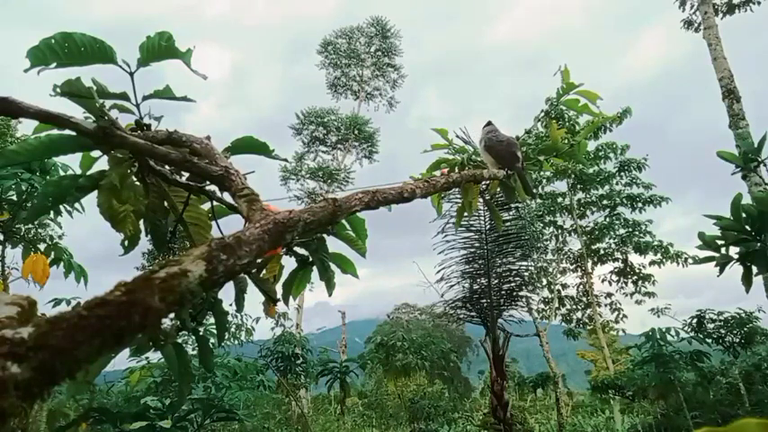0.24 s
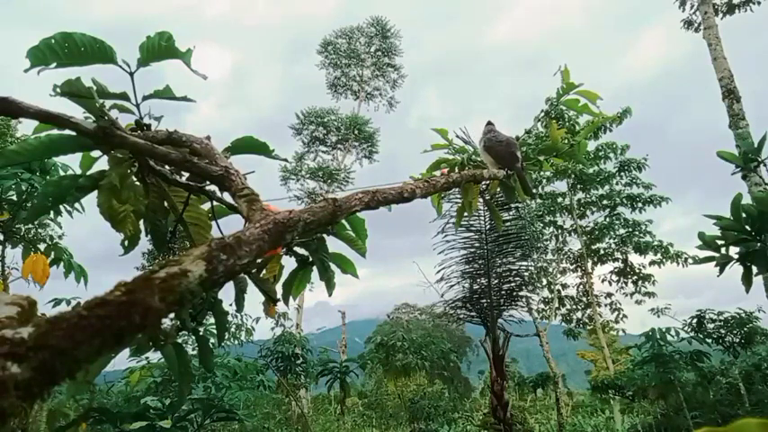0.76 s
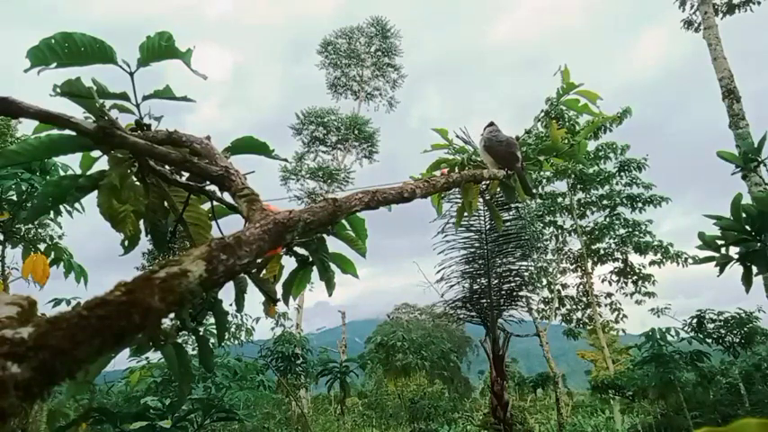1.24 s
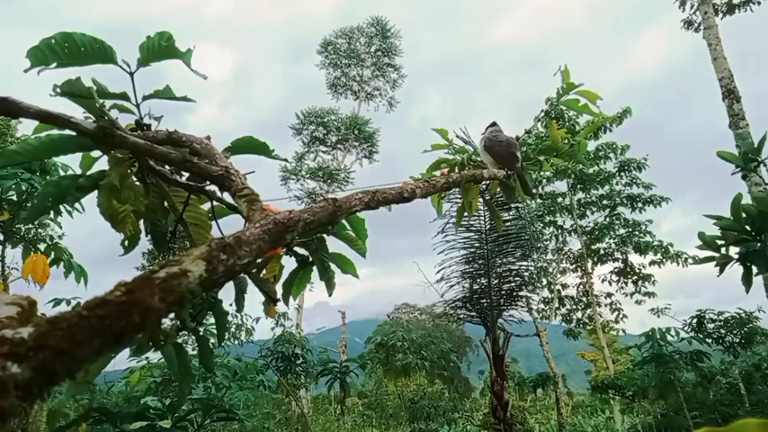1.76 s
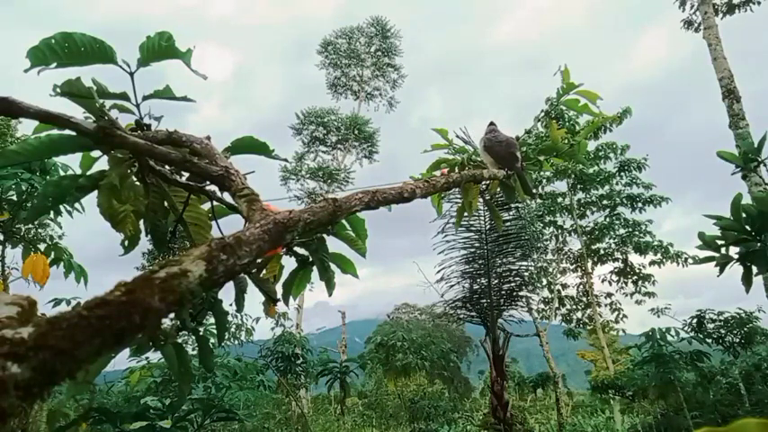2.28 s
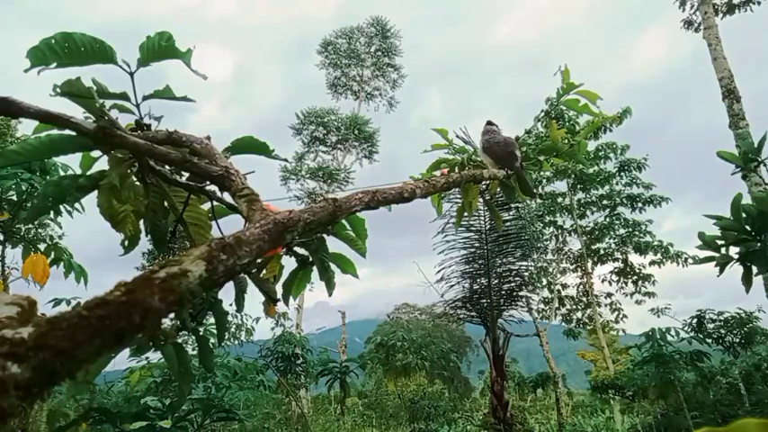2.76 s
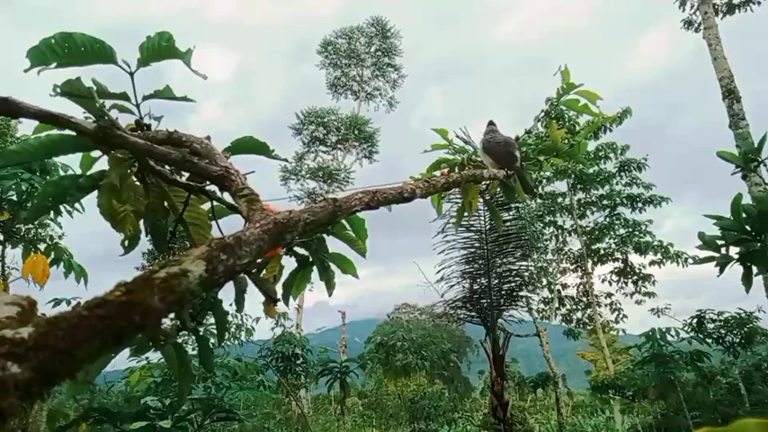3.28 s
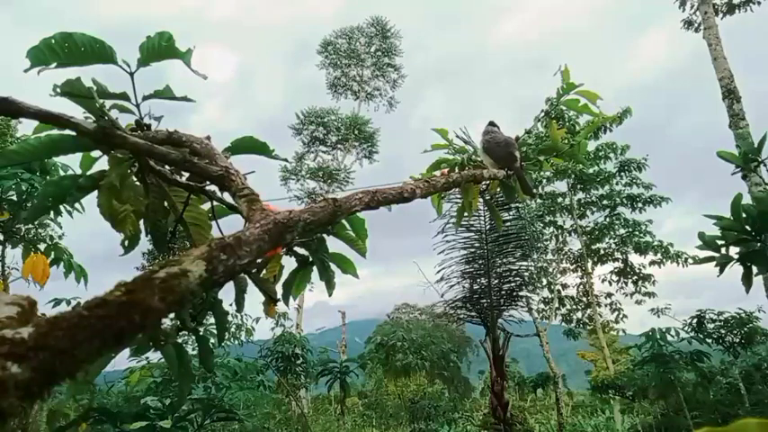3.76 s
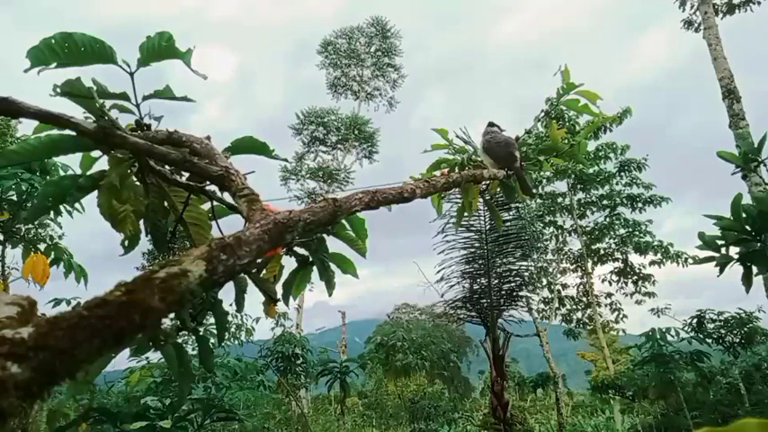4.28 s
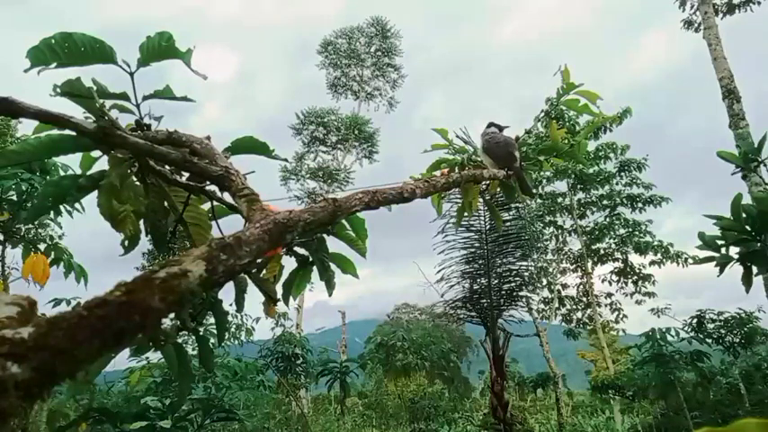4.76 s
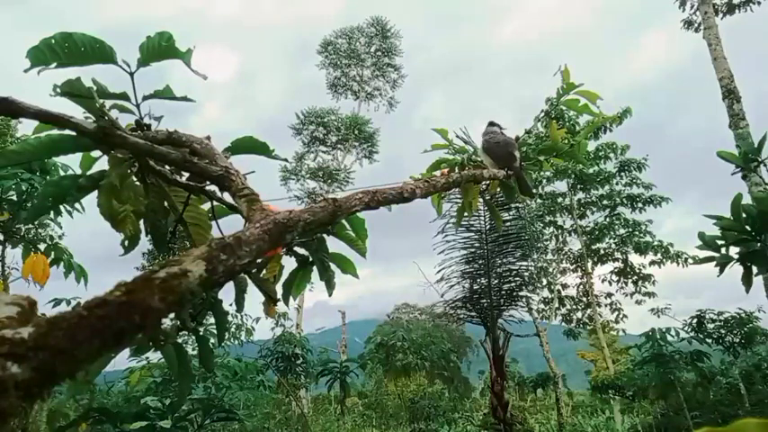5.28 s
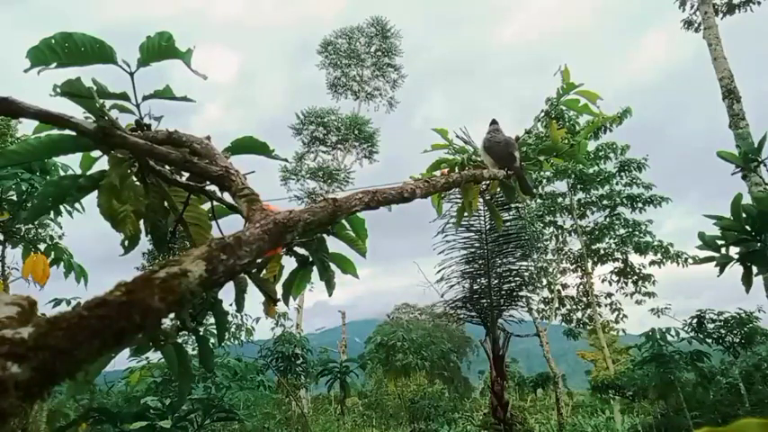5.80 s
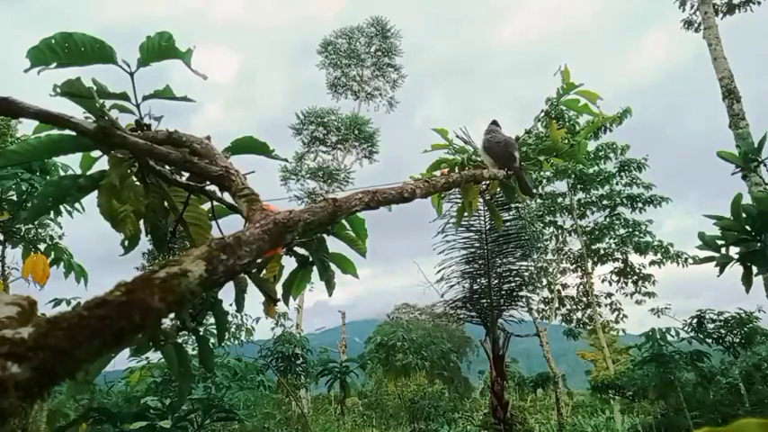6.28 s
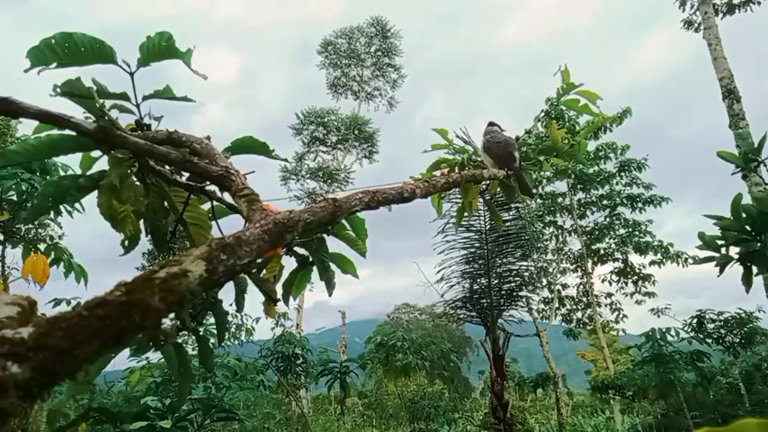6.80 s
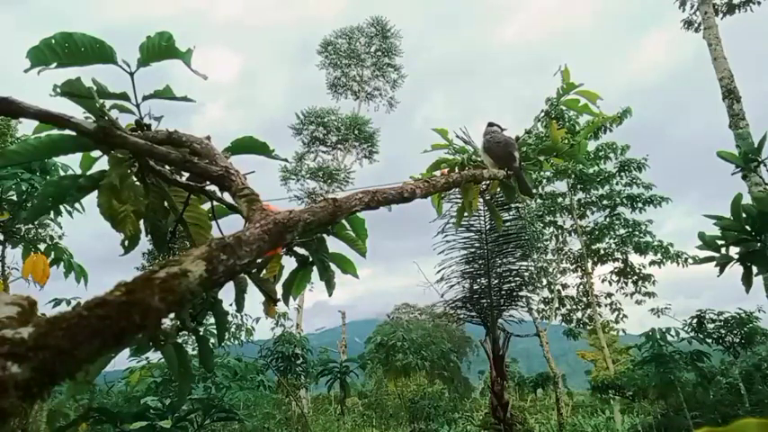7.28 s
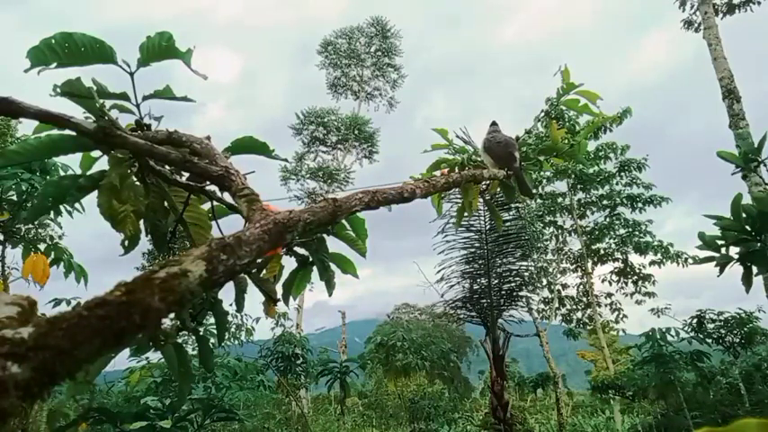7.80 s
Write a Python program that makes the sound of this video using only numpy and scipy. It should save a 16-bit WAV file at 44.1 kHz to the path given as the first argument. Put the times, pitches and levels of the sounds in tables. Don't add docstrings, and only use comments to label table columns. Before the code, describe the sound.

An outdoor wooded slope with a steady, gently swelling low rumble, soft insect-filled air and thin microphone hiss. At 0.6, 0.8 and 1.05 seconds a neighbouring bird gives short, dry rattles. At 1.1 the main bird bursts in, close and very loud: a tiny fluttering buzz, then quick piercing whistles that hook up and arch over, ending on a held note by 1.4. The background drops and slowly recovers. Faint distant rattles follow at 1.7-2.2 and 2.8-3.5, with soft coos near 3.2. The phrase repeats at 3.7-4.0, its last note rising, answered by faint far singers. Three stronger rattles come at 5.3-5.7, then a distant wavering cock crow until 6.4. Four quieter rattles run from 6.7 to 7.25, leading to the third phrase at 7.3-7.6, its last note fading. Short echoes scatter from the trees, and the ducked rumble returns until 8 seconds.

```python
import sys
import numpy as np
from scipy import signal
from scipy.fft import rfft, irfft, next_fast_len
from scipy.io import wavfile
from scipy.ndimage import uniform_filter1d

SR = 44100
rng = np.random.default_rng(int(sys.argv[2]) if len(sys.argv) > 2 else 0)


def master_out(mix):
    frames = np.transpose(np.atleast_2d(mix))
    ceiling = np.clip(frames, -1, 1)
    pcm = np.round(ceiling * 32767).astype(np.int16)
    wavfile.write(sys.argv[1], SR, pcm)


def gain_from_decibels(decibels):
    exponent = np.asarray(decibels, float) / 20
    return 10 ** exponent


N = 354652

# freq_hz, density_db
RUMBLE = [(12, -52), (20, -31), (38, -31), (70, -6), (151, 1), (290, -8), (347, -12), (472, -19),
          (677, -22), (1500, -33), (1950, -62.5), (3300, -120)]
# freq_hz, density_db
AIR = [(900, -30), (1250, -12.5), (1700, -3), (2300, -1.5), (3000, -3.5), (3600, -5), (4300, -10),
       (5000, -17.5), (5500, -15), (6200, -8.5), (6900, -16.5), (7900, -8), (8700, -12), (9500, -28.5)]
# freq_hz, density_db
HISS = [(7000, -18.5), (9500, 1.5), (12000, -4), (15500, -5.5), (16500, -30.5)]
RUMBLE_DB, AIR_DB, HISS_DB = -37.5, -54, -81
# time_s, level_db
SWELL = [(0, 0), (.8, 3), (1.3, -1), (1.8, 5), (2.5, 0.5), (3.4, 1.5), (4.2, 1.5), (4.9, 1), (5.9, 2),
         (6.6, 0), (7.2, 1.5), (7.5, -1.5), (8.04, 4)]

# start_s, drop_db
DUCKS = [
    (1.25, 12.5),
    (3.871, 11),
    (7.428, 13),
]
DUCK_ATTACK_S, DUCK_RELEASE_S, START_DROP_DB = 0.011, 1.15, 1.32
CEILING = 1.02

# level_db, decay_60db_s
NEAR_TRUNKS = (-18, .17)
# level_db, decay_60db_s
SLOPE = (-36, 1.15)
# delay_s, spread_s, level_over_slope_db
STAND = (.125, 0.014, 9)
# near_trunks_db, slope_db
FAR_ECHO_DB = (-2, -11)
LEAF_CUT_HZ = 2100

# time_s, pitch_hz, level_db
CROW = [
    [(5.7, 615, -50), (5.82, 748, -58.5), (5.89, 842, -44.5), (5.99, 827, -43), (6.03, 798, -50.5),
     (6.06, 814, -42), (6.26, 819, -44), (6.3, 803, -59), (6.44, 790, -54.5)],
]
# start_s, length_s, first_hz, last_hz, level_db
FAR_CHIRPS = [(3.515, .11, 3530, 3480, -57), (4.28, .07, 3250, 2850, -59), (4.37, .04, 2750, 3050, -62),
              (1.96, .1, 2960, 2940, -66), (5.98, .1, 2860, 2850, -66), (6.12, .08, 2850, 2830, -67),
              (6.22, .35, 2865, 2760, -64)]
FAR_HOOTS = [(2.64, .15, 1127, 1125, -72), (3.15, .08, 990, 960, -63), (3.47, .1, 1000, 960, -66),
             (4.16, .2, 880, 860, -69), (4.47, .15, 800, 830, -70), (4.6, .08, 960, 940, -66),
             (4.71, .08, 1045, 1000, -66), (6.0, .25, 1085, 1075, -66), (6.52, .06, 770, 740, -60),
             (6.65, .14, 1070, 1000, -64)]
COOS = [
    (3.11, .08, 745, 775, -55),
    (3.16, .13, 785, 730, -53),
    (3.26, .08, 735, 695, -58),
]
# place (-1 to 1), share_of_glide, level_db
CALL = [(-1.1, 0.012, -4.5), (-0.42, 0.3, -1.5), (.3, 0.76, -0.5), (0.98, 1, -9)]
# delay_s, level_db
FAR_SINGERS = [(.76, -47), (1.235, -50), (.41, -53)]

# start_s, peak_db, length_s, pulse_rate_hz
FAR_SONG_BITS = [(1.73, -55, 0.073, 237), (1.85, -57.5, .044, 234.5), (2.05, -60, 0.044, 228),
                 (2.21, -55.5, 0.04, 241), (4.89, -63.5, 0.039, 234)]
RATTLES_FAR = [(2.77, -51.5, .086, 269), (2.975, -47, 0.053, 256), (3.172, -46, 0.068, 266),
               (3.275, -46.5, 0.058, 259), (3.39, -47.5, 0.06, 255), (3.5, -47, 0.078, 261)]
RATTLES_EARLY = [(.6255, -24, 0.054, 375), (.8245, -24, 0.046, 310), (1.063, -24, 0.067, 430)]
RATTLES_MIDDLE = [(5.2755, -21.5, 0.072, 255), (5.48, -18, 0.051, 245.3), (5.698, -18.5, 0.055, 256.4)]
RATTLES_LATE = [(6.6785, -28.5, 0.064, 292.2), (6.8545, -26.5, 0.043, 290), (7.042, -26, 0.047, 297.4),
                (7.2375, -24.5, 0.041, 291)]
# core_hz, echo_hz
CORE_FARTHEST = (2600, 3700)
CORE_FAR = (3250, 3300)
CORE_EARLY = (3370, 3200)
CORE_MIDDLE = (3310, 3590)
CORE_LATE = (3380, 3000)
# freq_hz, width_hz, level_db
THROAT_FARTHEST = [(3440, 920, 29.7), (4150, 300, 6.3)]
THROAT_FAR = [(1700, 400, 8), (2980, 400, 27), (3530, 260, 20)]
THROAT_EARLY = [(1520, 220, 21), (1920, 250, 18), (2900, 790, 19), (3970, 420, 21)]
THROAT_MIDDLE = [(1800, 530, 13.8), (2160, 260, 3.7), (3900, 290, 17.3), (4260, 350, 18.8)]
THROAT_LATE = [(1530, 140, 13), (2340, 240, 18), (2800, 510, 17.9), (4090, 400, 6.2)]
# breathiness (0-1), held_tone (0-1), edge_s, loudest_at (share of length)
VOICE_FARTHEST = (0.82, .11, .012, .3)
VOICE_FAR = (0.95, .4, .016, 0.23)
VOICE_EARLY = (0.38, .55, .0008, 0.27)
VOICE_MIDDLE = (0.28, 0.1, .00041, 0.21)
VOICE_LATE = (.3, 0.6, .0004, 0.17)

# freq_hz, level_db
OVERTONES = [(2500, -33.5), (3600, -15), (4300, -36.5), (5100, -43.5), (6000, -55), (7600, -53.5),
             (8700, -54.5), (10000, -48), (11300, -56.5), (15500, -66.5)]
# time_s, width_s, level_db
SLIPS = [(1.2133, .001, -4), (1.2187, .003, 2.5), (1.2216, .001, -7), (1.225, .002, 2.5),
         (1.2575, .003, 1.5), (1.2763, .001, -2), (1.2813, .001, -6.5), (1.2869, .001, -3),
         (1.2896, .0008, -4), (1.3358, .002, 1.5), (1.3385, .0015, -2), (3.83, 0.00087, -2.5),
         (3.834, 0.00081, -7), (3.8355, .001, 2.5), (3.8373, .0012, -3.5), (3.857, .002, -4.5),
         (3.867, .002, -8.5), (3.8782, .001, -4), (3.891, .001, -4), (3.8978, .002, -1.5), (3.901, .003, 2),
         (3.921, 0.000798, -4), (7.385, .004, -3), (7.3923, .0012, 2.5), (7.396, .0007, -3),
         (7.446, 0.0013, -3), (7.455, .003, 2), (7.4634, .002, -3.5), (7.467, .001, 0), (3.7464, .001, 3),
         (7.298, .001, 2), (7.308, .001, 2), (1.133, .001, 3), (1.142, .0015, -5), (1.1495, .001, -4.5),
         (1.154, .001, -3.5), (3.7642, .0007, -5.5), (3.768, .0008, -6.5), (3.7717, .0015, 2.5),
         (7.314, .0015, 4.5), (7.3175, .0015, -2.5), (7.3267, .0008, -3.5)]

# time_s, pitch_between_crests_hz, second_harmonic_db, fundamental_db
BUZZES = [
    [(1.102, 1760, -28, -43), (1.1084, 1850, -10, -28.5), (1.112, 1939, -13, -22),
     (1.123, 1959, -13, -18.5), (1.1376, 1911, -5.5, -20.5), (1.1415, 1916, -8, -20),
     (1.1455, 1844, -6, -28.5), (1.1558, 1833, -15.5, -31), (1.159, 1797, -29.5, -41)],
    [(3.714, 1700, -33.5, -49), (3.7217, 1900, -23.5, -28.5), (3.7332, 2092, -21, -18),
     (3.7457, 2063, -16.5, -17.5), (3.7518, 1933, -11.5, -21.5), (3.759, 2002, -15, -21.5),
     (3.7668, 1694, -5, -27.5), (3.7729, 1651, -11.5, -39.5), (3.778, 1700, -25, -40)],
    [(7.272, 1600, -31, -49.5), (7.277, 1780, -17, -37.5), (7.2805, 1873, -13.5, -26),
     (7.2947, 2012, -22.5, -14.5), (7.2986, 2014, -14, -17.5), (7.3088, 1923, -11.5, -20),
     (7.3185, 1862, -13, -24), (7.3255, 1520, -4, -33.5), (7.333, 1537, -22.5, -39)],
]
# first_crest_s, fades_out_s, start_rate_hz, end_rate_hz, swing_hz
FLUTTERS = [(1.1107, 1.1444, 219, 140, 450), (3.7217, 3.7585, 249, 75, 540), (7.2825, 7.321, 240, 96, 420)]
# start_s, length_s, first_hz, last_hz, level_db
UNDERTONES = [(1.104, .016, 3650, 3200, -18), (3.713, .022, 3250, 3750, -18.5),
              (7.272, .024, 2850, 3500, -18), (3.705, 0.0037, 2600, 2900, -36),
              (7.2655, 0.0049, 2500, 2900, -29.5)]
BUZZ_SHEEN_DB = (0, 0, -6)
BEAK_HZ, BEAK_WIDTH_HZ = 9286, 1200

# time_s, pitch_hz, level_db
HOOKS = [
    [(1.197, 1857, -37), (1.2011, 1844, -14.5), (1.2083, 2042, -13.5), (1.2095, 2037, -8.5),
     (1.2165, 2546, -2.5), (1.2224, 2282, -11.5), (1.2281, 2237, -7), (1.2331, 2327, -5.5),
     (1.2355, 2333, -30.5)],
    [(3.817, 1717.0, -44.5), (3.819, 1715, -30), (3.8254, 1727, -12.5), (3.8326, 2152, -1),
     (3.8385, 2530, -10), (3.8397, 2444, -3), (3.8481, 2260, -10), (3.8533, 2350, -3.5),
     (3.8595, 2313, -30)],
    [(7.377, 1792, -28), (7.3809, 1761, -13), (7.3881, 1847, -8.5), (7.3947, 2532, -2),
     (7.3994, 2474, -4.5), (7.4033, 2257, -10), (7.4065, 2319, -5.5), (7.4178, 2330, -30.5),
     (7.419, 2320, -31.5)],
]
ARCHES = [
    [(1.248, 2430, -22), (1.2523, 2970, -6), (1.2566, 2980, -4.5), (1.2657, 3250, -5), (1.2732, 3220, -2.5),
     (1.2795, 2800, -9), (1.2872, 2860, -9), (1.2929, 2960, -14.5), (1.2945, 2907, -33)],
    [(3.867, 2264, -19.5), (3.8752, 2930, -3), (3.8867, 2997, -3.5), (3.8913, 3310, -7.5),
     (3.8933, 3160, -5), (3.904, 2940, -5), (3.9087, 2825, -12), (3.9187, 2770, -7), (3.924, 2756, -23.5)],
    [(7.4235, 2582, -27.5), (7.4264, 3030, -20.5), (7.436, 2910, -8.5), (7.443, 3060, -4),
     (7.4455, 3216, -8), (7.4562, 2980, -5.5), (7.4623, 2806, -5.5), (7.4702, 2747, -6),
     (7.476, 2800, -23.5)],
]
# time_s, pitch_hz, level_db
HELDS = [
    [(1.322, 2484.0, -29.5), (1.3327, 2450, -8), (1.3404, 2421, -24), (1.3415, 2467.0, -15),
     (1.3551, 2487, -11), (1.3653, 2473, -15), (1.3766, 2512, -14), (1.3828, 2477.0, -25.5),
     (1.386, 2477.0, -34.5)],
    [(3.9543, 2395, -22), (3.9672, 2366, -14), (3.982, 2543, -6), (3.9933, 2630, -7), (4.0049, 2634, -9),
     (4.0071, 2643, -13.5), (4.0192, 2566.0, -7.5), (4.0225, 2671, -10.5), (4.0265, 2560, -32)],
    [(7.502, 2515, -33.5), (7.5086, 2422, -20.5), (7.5269, 2516, -8), (7.5381, 2610, -8),
     (7.5551, 2600, -9.5), (7.5648, 2662, -17), (7.5757, 2593, -13.5), (7.5877, 2614, -30.3),
     (7.592, 2580, -46.5)],
]
# crest_s, rise_s, fall_s, pitch_hz, level_db
CATCHES = [(1.303, 0.0065, .007, 1660, -30.5), (3.93, 0.0069, 0.008, 1610, -30),
           (7.484, 0.0055, 0.0086, 1680, -33)]
GRACES = [(1.313, .008, 0.0066, 2053, -18), (3.939, 0.0088, 0.0077, 2250, -18),
          (7.491, .006, .006, 2310, -19)]
# place (-1 to 1), pitch_ratio, level_db
CATCH = [(-0.88, 1.75, 5), (-.5, 1.2, -1), (-0.18, 1.0, -2.5), (.5, 1.08, -3), (0.98, 1.3, -1)]
GRACE = [(-1, .86, -12), (-.5, .93, -4), (0, 1.0, -1), (.6, 1.03, -2), (1, 1.02, -15)]
# start_s, length_s, first_hz, last_hz, level_db
LINKS = [(1.2365, .011, 2304, 1950, -23), (3.8605, .008, 2297, 2000, -21), (7.42, .006, 2304, 2000, -29)]
# low_overtones_db, high_overtones_db
OPENING = [(7, -2.5), (-1, 1), (-8.5, 1), (5.5, 1.5), (-2, 6), (1.5, 11), (5, 6), (0.5, 2), (1.5, 6),
           (5, 0), (-6, 0.5), (-4, 6)]
WHISTLE_RASP_DB, HALF_TONE_DB = 4.5, -44.5


def rms_one(x):
    return x / np.sqrt(np.mean(x ** 2) + 1e-20)


def drift(rate_hz, count):
    r = np.exp(-2 * np.pi * rate_hz / SR)
    settle = 8000
    slow = signal.lfilter([1], [1, -2 * r, r * r], rng.standard_normal(count + settle))
    return rms_one(slow[settle:])


def fade(t, edge_s):
    return np.clip(np.minimum(t - t[0], t[-1] - t) / edge_s, 0, 1)


def resonance(x, hz, width_hz):
    r = np.exp(-np.pi * width_hz / SR)
    poles = [1, -2 * r * np.cos(2 * np.pi * hz / SR), r * r]
    return signal.lfilter(np.array([1, 0, -1]) * (1 - r * r) / 2, poles, x)


def spectrum_db(points, hz):
    freq_hz, level_db = np.transpose(points)
    return np.interp(np.log(hz), np.log(freq_hz), level_db)


def note(rows):
    s, *columns = np.transpose(rows)
    at = np.arange(max(int(s[0] * SR), 0), min(int(s[-1] * SR), N))
    t = at / SR
    return at, t, [np.interp(t, s, column) for column in columns]


def glides(events):
    return [[(s + length * (place + 1) / 2, first + (last - first) * share, db + rel)
             for place, share, rel in CALL]
            for s, length, first, last, db in events]


def stretched(shape, events):
    return [[(s + place * (rise if place < 0 else fall), hz * ratio, db + rel)
             for place, ratio, rel in shape]
            for s, rise, fall, hz, db in events]


def tones(notes, wobble_db, wobble_rate, edge_s, second_db=-90, jitter_hz=0):
    out = np.zeros(N)
    for rows in notes:
        at, t, (hz, level_db) = note(rows)
        hz = uniform_filter1d(hz, size=60) + jitter_hz * drift(wobble_rate, len(at))
        phase = 2 * np.pi * np.cumsum(hz) / SR
        level_db = uniform_filter1d(level_db, size=40) + wobble_db * drift(wobble_rate, len(at))
        wave = np.sin(phase) + gain_from_decibels(second_db) * np.sin(2 * phase)
        out[at] += np.sqrt(2) * gain_from_decibels(level_db) * fade(t, edge_s) * wave
    return out


def background(spectrum, patchy_db, patch_rate):
    size = next_fast_len(N, real=True)
    hz = np.maximum(np.fft.rfftfreq(size, 1 / SR), 1)
    shaped_noise = rfft(rng.standard_normal(size)) * gain_from_decibels(spectrum_db(spectrum, hz))
    together = drift(4.0, N)
    place = 2 * np.log2(hz)
    lowest, highest = 2 * np.log2(spectrum[0][0]), 2 * np.log2(spectrum[-1][0])
    coarse = N // 32 + 2
    out = 0
    for centre in np.arange(int(lowest), highest + 1):
        band = irfft(shaped_noise * np.clip(1 - abs(place - centre), 0, 1), size)[:N]
        own = np.interp(np.arange(N) / 32, np.arange(coarse), drift(32 * patch_rate, coarse))
        out = out + band * gain_from_decibels(patchy_db * (1.5 * together + own))
    return rms_one(out)


def ambience():
    swell = gain_from_decibels(np.interp(np.arange(N) / SR, *np.transpose(SWELL)))
    rumble = gain_from_decibels(RUMBLE_DB) * swell * background(RUMBLE, 1.2, 6.3)
    air = gain_from_decibels(AIR_DB) * background(AIR, 0.62, 6.1)
    return rumble + air + gain_from_decibels(HISS_DB) * background(HISS, 0.4, 8)


def gain():
    t = np.arange(N) / SR
    drop_db = np.full(N, START_DROP_DB)
    for s, db in DUCKS:
        since = np.maximum(t - s, 0)
        drop_db += db * (1 - np.exp(-since / DUCK_ATTACK_S)) * np.exp(-since / DUCK_RELEASE_S)
    return gain_from_decibels(-drop_db)


def trees(x, near_db, far_db, stand=0):
    t = np.arange(2 * SR) / SR
    near, far = rng.standard_normal((2, len(t)))
    near = near * gain_from_decibels(-60 * t / NEAR_TRUNKS[1]) * np.clip((t - 0.003) / 0.011, 0, 1)
    far = signal.lfilter([0.5], [1, -0.5], far)
    far = far * gain_from_decibels(-60 * t / SLOPE[1] + 3 * drift(7, len(t))) * np.clip(t / 0.04, 0, 1)
    delay_s, spread_s, stand_db = STAND
    bunch = 1 + stand * gain_from_decibels(stand_db) * np.exp(-((t - delay_s) / spread_s) ** 2)
    far = far / np.linalg.norm(far) * bunch
    echo = gain_from_decibels(near_db) * near / np.linalg.norm(near) + gain_from_decibels(far_db) * far
    return signal.fftconvolve(x, echo)[:N]


def rattles(events, core, throat, voice):
    drive, voiced = np.zeros((2, N))
    core_hz, echo_hz = core
    breath, held, edge_s, crest = voice
    for s, peak_db, length, rate in events:
        at = np.arange(int(s * SR), int((s + length) * SR))
        count = len(at)
        pulse_chance, puff = rng.standard_normal((2, 4000))
        turns = np.cumsum(rate * (1 + 0.12 * drift(60, 4000)[:count])) / SR
        cycle = turns % 1
        arc_db = -20.0 * (np.linspace(0, 1, count) - crest) ** 2
        strength = gain_from_decibels(peak_db + 1.1 * pulse_chance[turns.astype(int)] + arc_db)
        edge = fade(at / SR, edge_s)
        clicks = np.diff(np.floor(turns), prepend=-1)
        drive_edge = edge if edge_s > 0.004 else 1
        drive[at] += drive_edge * strength * (clicks + breath * 0.089 * puff[:count])
        gate = np.clip(cycle / 0.093, 0, 1) * np.clip((0.85 - cycle) / 0.9, 0, 1)
        hz = core_hz * (1 + 0.062 * (0.4 - cycle) + 0.027 * drift(280, 4000)[:count])
        swell = uniform_filter1d(strength * (held + (1 - held) * gate), size=12) * edge
        voiced[at] += swell * np.sin(2 * np.pi * np.cumsum(hz) / SR)
    rung = 0
    for hz, width, db in throat:
        once = resonance(drive + 1e-18, hz, width)
        rung = rung + gain_from_decibels(db) * resonance(once, hz, 1.3 * width)
    body = signal.butter(4, [1250, 4800], "band", fs=SR, output="sos")
    direct = signal.sosfilt(body, voiced + rung)
    thrown = resonance(resonance(0.5 * voiced + 2.9 * rung, echo_hz, 400), echo_hz, 800)
    return direct, thrown


def far_birds(song_with_weak_buzz):
    second_phrase = song_with_weak_buzz * (abs(np.arange(N) / SR - 3.82) < 0.11)
    second_phrase = resonance(second_phrase, 3530, 1086)
    far = sum(gain_from_decibels(db) * np.roll(second_phrase, int(s * SR)) for s, db in FAR_SINGERS)
    distant = rattles(RATTLES_FAR, CORE_FAR, THROAT_FAR, VOICE_FAR)[0]
    far = far + distant + trees(distant, -2.0, -10.0)
    far = far + rattles(FAR_SONG_BITS, CORE_FARTHEST, THROAT_FARTHEST, VOICE_FARTHEST)[0]
    far = far + tones(glides(FAR_CHIRPS), 4.8, 30, 0.0057)
    far = far + tones(glides(FAR_HOOTS), 6.0, 60, 0.01)
    return far + tones(glides(COOS), 4.5, 70, 0.015, second_db=-12, jitter_hz=14)


def far_cock():
    return tones(CROW, 2.4, 25, 0.0127)


def neighbour():
    early = rattles(RATTLES_EARLY, CORE_EARLY, THROAT_EARLY, VOICE_EARLY)
    middle = rattles(RATTLES_MIDDLE, CORE_MIDDLE, THROAT_MIDDLE, VOICE_MIDDLE)
    late = rattles(RATTLES_LATE, CORE_LATE, THROAT_LATE, VOICE_LATE)
    return np.sum([early, middle, late], axis=0)


def slips(t):
    return sum(db * np.exp(-((t - s) / width) ** 2) for s, width, db in SLIPS)


def overtones(hz, phase, orders, rasp_db, rasp_rate):
    freq_hz, level_db = np.transpose(OVERTONES)
    out = 0
    for k in orders:
        passed_db = np.interp(np.log(k * hz), np.log(freq_hz), level_db, right=-99)
        out = out + gain_from_decibels(passed_db + rasp_db * drift(rasp_rate, len(hz))) * np.sin(k * phase)
    return out


def buzzes():
    out = tones(glides(UNDERTONES), 3.5, 500, 0.002, jitter_hz=90)
    throat = signal.butter(8, [1400, 4850], "band", fs=SR, output="sos")
    for rows, flutter, sheen_db in zip(BUZZES, FLUTTERS, BUZZ_SHEEN_DB):
        at, t, (hz, second_db, first_db) = note(rows)
        count = len(at)
        crest, end, rate_start, rate_end, swing_hz = flutter
        since = t - crest
        turns = rate_start * since + (rate_end - rate_start) * since ** 3 / (3 * (end - crest) ** 2)
        shake = np.clip((end - t) / 0.008, 0, 1) * np.clip((since + 0.004) / 0.006, 0, 1)
        up = (0.5 + 0.5 * np.cos(2 * np.pi * turns)) ** 1.4 * shake
        pitch = hz + swing_hz * up + (25 + 20 * shake) * drift(700, count)
        phase = 2 * np.pi * np.cumsum(uniform_filter1d(pitch, size=20)) / SR

        dip_db = 7 * up + (1.2 + 1.2 * shake) * drift(400, count)
        first = gain_from_decibels(first_db + 2.0 * drift(270, count)) * np.sin(phase)
        second = gain_from_decibels(second_db - 0.5 - dip_db + slips(t)) * np.sin(2 * phase)
        middle_db = 0.5 * (second_db + first_db)
        breath = rng.standard_normal(count) * gain_from_decibels(middle_db - 10.5)
        body = signal.sosfilt(throat, first + second + breath)

        upper = overtones(pitch, phase, range(3, 9), 5.4, 800)
        upper = upper * gain_from_decibels(middle_db + 18.0 + sheen_db) * np.clip((t - t[0]) / 0.02, 0, 1)
        beak = 2.0 * resonance(upper, BEAK_HZ, BEAK_WIDTH_HZ) + 1.1 * resonance(upper, 14900, 900)
        out[at] += np.sqrt(2) * fade(t, 0.0012) * (body + 0.43 * upper + beak)
    return out


def whistles():
    out = np.zeros(N)
    notes = HELDS + HOOKS + ARCHES + stretched(GRACE, GRACES)
    for k, (rows, (low_db, high_db)) in enumerate(zip(notes, OPENING)):
        at, t, (hz, level_db) = note(rows)
        hz = uniform_filter1d(hz, size=60)
        phase = 2 * np.pi * np.cumsum(hz) / SR
        level_db = uniform_filter1d(level_db, size=70) + 0.5 * drift(150, len(at)) + slips(t)
        low = gain_from_decibels(low_db) * overtones(hz, phase, range(2, 4), WHISTLE_RASP_DB, 150)
        high = gain_from_decibels(high_db) * overtones(hz, phase, range(4, 7), 1.4 * WHISTLE_RASP_DB, 400)
        upper = (low + high) * gain_from_decibels(-0.8 * np.maximum(level_db + 13.5, 0))
        wave = np.sin(phase) + upper
        if k < len(HELDS):
            wave = wave + gain_from_decibels(HALF_TONE_DB) * (np.sin(1.5 * phase) + 0.3 * np.sin(phase / 2))
        out[at] += np.sqrt(2) * gain_from_decibels(level_db) * fade(t, 0.0011) * wave
    return out


def scene():
    ducking = gain()
    buzz = buzzes()
    song = whistles() + buzz + tones(stretched(CATCH, CATCHES), 0.82, 200, 0.0019, second_db=-36.0)
    song = song + tones(glides(LINKS), 2.5, 200, 0.001)
    singer = song / ducking
    chatter, thrown = neighbour() / ducking
    far = far_birds(song - 0.7 * buzz) / ducking
    crow = far_cock() / ducking

    leaves = signal.butter(3, LEAF_CUT_HZ, "high", fs=SR, output="sos")
    echoes = trees(signal.sosfilt(leaves, singer), NEAR_TRUNKS[0], SLOPE[0], stand=0.98)
    echoes = echoes + trees(thrown, -2.5, -16.0) + trees(far, *FAR_ECHO_DB)
    echoes = echoes + trees(buzz, -14.0, -33.5)
    return (singer + chatter + far + crow + echoes + ambience())[None]


def roll_off(x):
    return signal.sosfilt(signal.butter(12, 15650, fs=SR, output="sos"), x)


def record(dry):
    x = dry * gain()
    envelope = abs(signal.hilbert(x[0], next_fast_len(N))[:N])
    x = x * uniform_filter1d(np.minimum(1, CEILING / (envelope + 1e-9)), size=24)
    return roll_off(np.clip(x, -1, 1))


dry = scene()
out = record(dry)
master_out(out)
```